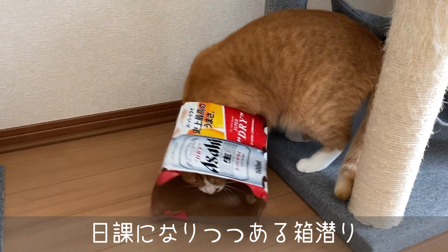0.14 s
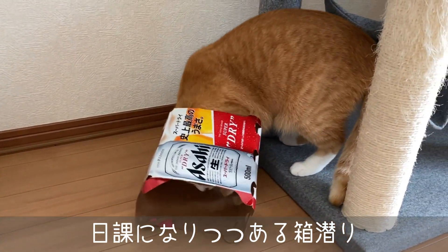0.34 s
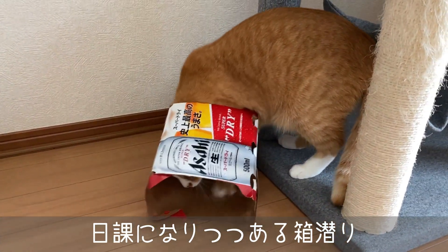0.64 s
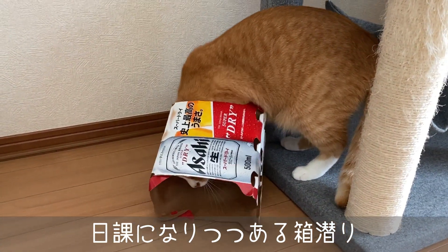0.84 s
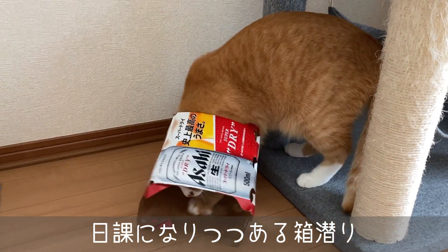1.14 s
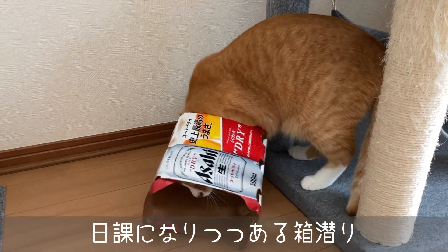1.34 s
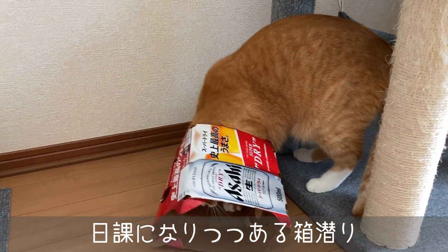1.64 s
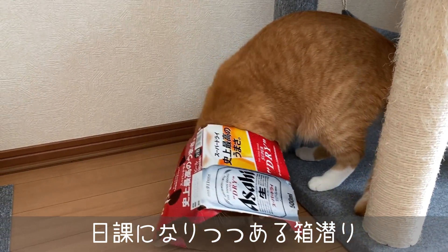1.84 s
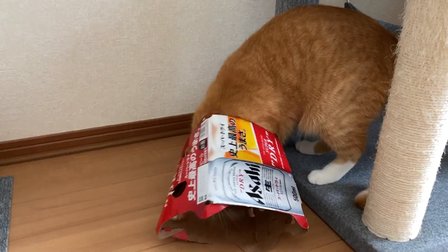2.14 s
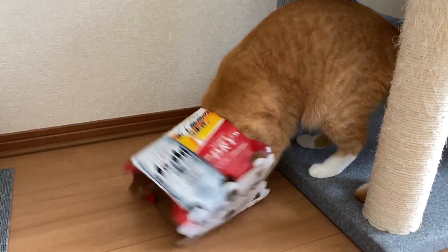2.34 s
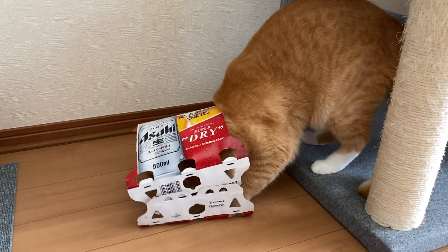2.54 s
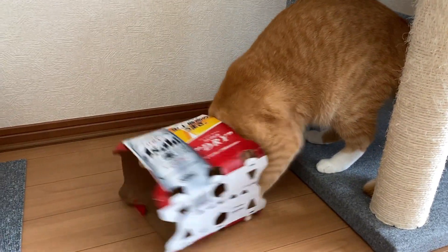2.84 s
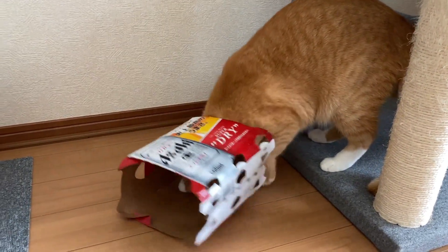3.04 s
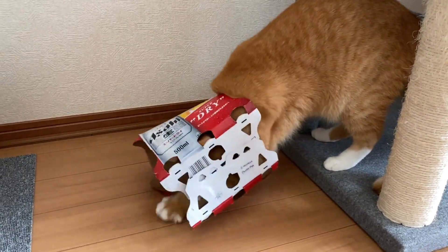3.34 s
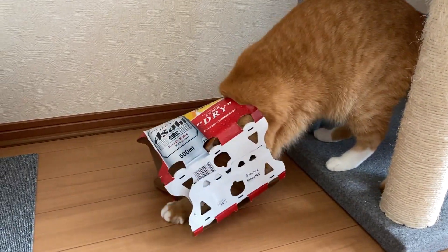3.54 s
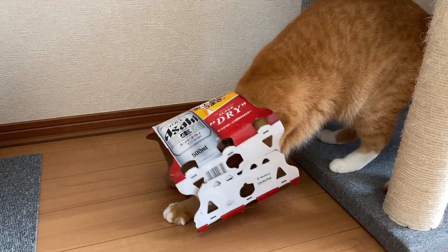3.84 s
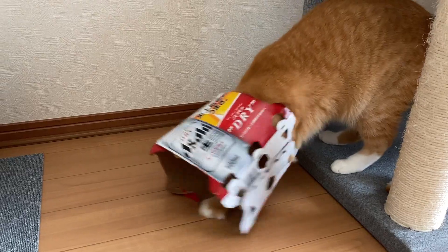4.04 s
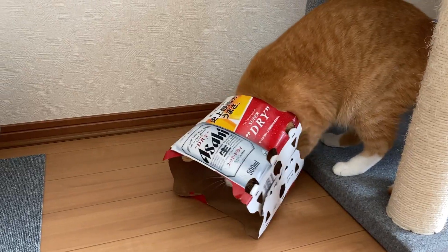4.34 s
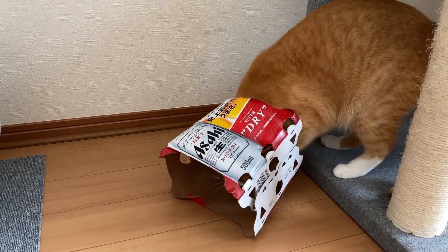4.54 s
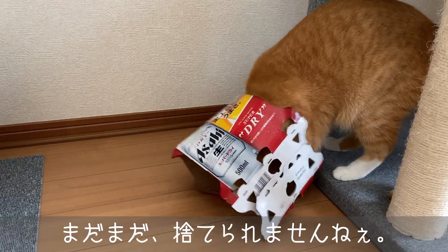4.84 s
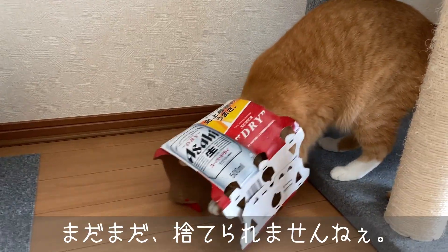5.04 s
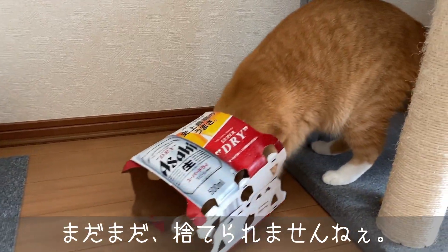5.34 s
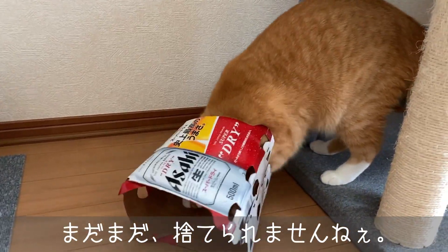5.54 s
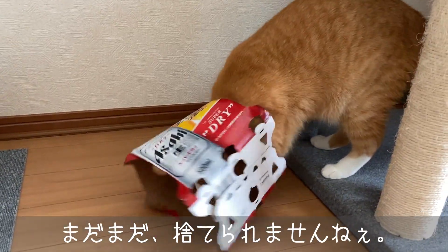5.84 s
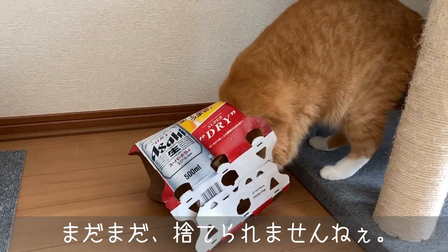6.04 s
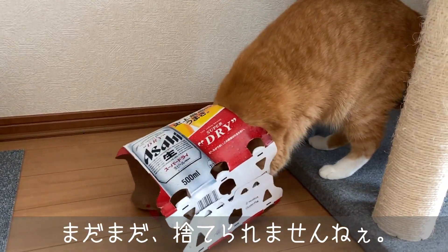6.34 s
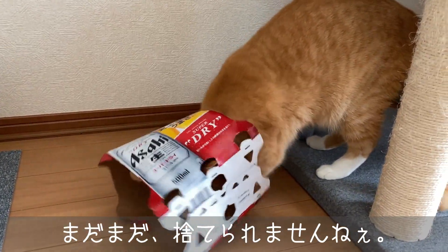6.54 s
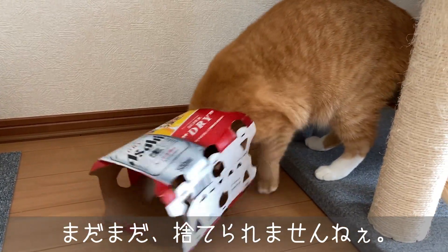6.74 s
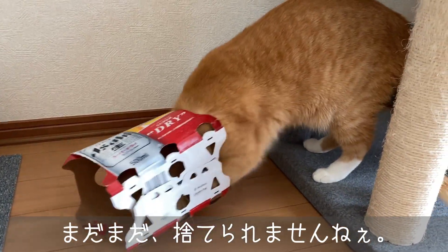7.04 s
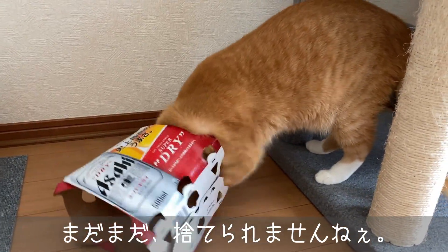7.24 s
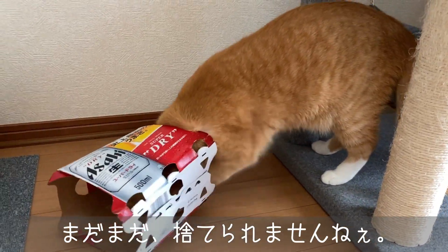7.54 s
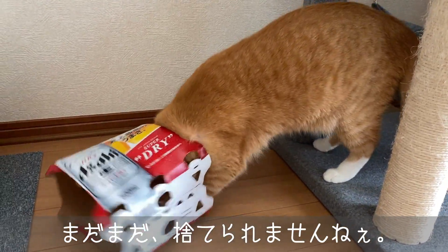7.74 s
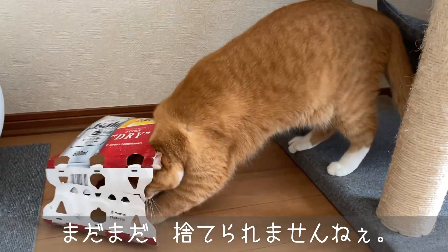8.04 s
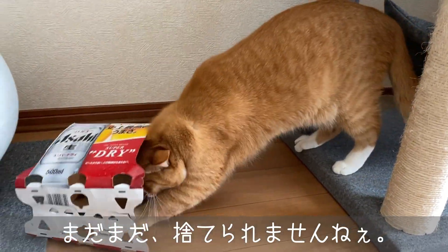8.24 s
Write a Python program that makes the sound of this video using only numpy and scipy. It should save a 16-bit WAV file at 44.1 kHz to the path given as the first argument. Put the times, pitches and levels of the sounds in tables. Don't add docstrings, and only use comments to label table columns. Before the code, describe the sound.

A small, quiet room heard close through a phone, with a faint low rumble of floorboards. From 0 to 2 s a cat nudges a thin cardboard sleeve very gently: soft fur brushes, weak rustles at about 0.6 and 1.2, a small tick and tap near 1.6. At 2.3 a stronger rasp swells into a loud boxy knock with a snap at 2.53, then a lighter knock at 2.86. Scrapes follow at 3.3, with a thud near 3.5 and crisp claw ticks at 3.85. Sliding builds to a bright scrape at 4.8 and a hard clack with floor thud at 4.93. Rubbing continues, rasping at 5.9, knocking at 6.27 and ticking sharply at 6.76. Around 7.08 to 7.25 an edge catches and stutters in a dense, loud cardboard judder. A knock at 7.44, hissy scrapes at 7.9, and a small tick at 8.24 lead to continued rustling at the end.

```python
import sys
import numpy as np
from scipy import signal
from scipy.fft import rfft, irfft, next_fast_len
from scipy.io import wavfile
from scipy.ndimage import uniform_filter1d, map_coordinates

SR = 44100
rng = np.random.default_rng(int(sys.argv[2]) if len(sys.argv) > 2 else 0)


def volts(x):
    e = np.asarray(x, float) / 20
    return 10 ** e


def master_out(mix):
    frames = np.transpose(np.atleast_2d(mix))
    ceiling = np.clip(frames, -1, 1)
    pcm = np.round(ceiling * 32767).astype(np.int16)
    wavfile.write(sys.argv[1], SR, pcm)


N = 369999

# (time [s], level [dB])
TREAD = [(0.0, -75), (0.61, -71), (0.72, -67), (1.38, -64), (2.08, -61.5), (3.36, -61), (3.67, -60.5),
         (3.88, -60), (4.53, -62.5), (5.61, -60), (5.8, -62.5), (6.4, -60), (7.45, -60), (7.57, -61.5),
         (8.16, -59.5), (8.39, -57)]
# (time [s], level [dB])
STIR = [(0, -82.5), (0.3, -81.5), (0.6, -75), (0.95, -78), (1.4, -70.5), (2, -70.5), (2.7, -66),
        (3.6, -68.5), (4.6, -68.5), (5.2, -68.9), (5.8, -74), (6.2, -66.5), (7, -67.5), (7.7, -67.5),
        (8.39, -64.5)]
# (frequency [Hz], density [dB per Hz])
RUMBLE = [(20, -20), (40, -12.5), (65, 3), (100, -6), (170, -4), (260, -12), (500, -75)]
# (frequency [Hz], density [dB per Hz])
SHUFFLE = [(150, -26), (250, -1), (500, -5.5), (750, -4), (1100, -19), (2000, -59)]
# (frequency [Hz], correlation [1])
ALIKE = [(60, 0.95), (200, 0.88), (400, 0.61), (800, -0.058), (1300, 0.69), (2300, 0.41), (4500, 0.11)]
# (start [s], rise [s], fall [s], peak pressure [dB])
SHOVES = [(.145, 0.1, 0.063, -68), (.586, 0.16, 0.17, -57.5), (.881, .023, .036, -71),
          (1.0, 0.019, 0.19, -68.5), (1.18, 0.13, 0.21, -55.5), (1.549, 0.022, 0.1, -56),
          (1.8, 0.028, 0.091, -77), (2.211, 0.02, 0.45, -55), (2.318, 0.24, 0.057, -43),
          (2.62, 0.37, 0.28, -54.5), (3.095, 0.077, 0.088, -55.5), (3.314, .11, 0.076, -48),
          (3.76, 0.06, 0.066, -51), (4.05, .13, 0.072, -49.5), (4.256, 0.13, .2, -56.5),
          (4.457, 0.034, 0.037, -60), (4.611, 0.058, 0.015, -60), (4.775, 0.037, 0.29, -51),
          (4.92, 0.046, 0.72, -49.5), (5.25, 0.5, 0.25, -50), (5.882, 0.1, 0.047, -45),
          (6.265, 0.017, 0.042, -38.5), (6.3, 0.25, 0.042, -54), (6.61, .04, 0.45, -49),
          (7.115, 0.036, .095, -36), (7.2, 0.047, 0.03, -41.5), (7.3, 0.058, 0.056, -48),
          (7.38, .07, 0.25, -50), (7.85, 0.11, 0.18, -48), (8.03, 0.293, 0.036, -54)]
# (start [s], rise [s], fall [s], peak speed [dB])
SLIDES = [(0.152, 0.015, 0.11, -58), (0.614, 0.1, 0.12, -52.5), (0.873, 0.025, 0.038, -69),
          (0.996, 0.0025, 0.3, -64.5), (1.186, 0.13, 0.083, -51.0), (1.51, 0.049, 0.14, -66),
          (1.81, 0.021, 0.041, -63), (2.213, 0.0099, 0.052, -59.9), (2.298, 0.21, 0.047, -42.5),
          (2.659, 0.14, 0.13, -53), (2.878, 0.091, 0.21, -49), (3.321, 0.091, 0.06, -45.5),
          (3.767, 0.028, 0.097, -55), (4.062, 0.084, 0.17, -52.5), (4.241, 0.13, 0.119, -48),
          (4.626, 0.039, 0.016, -67), (4.786, 0.11, 0.059, -39), (5.01, 0.029, 0.2, -48.5),
          (5.219, 0.2, 0.093, -55), (5.535, 0.1, 0.12, -45.5), (5.888, 0.087, 0.035, -40),
          (6.262, 0.021, 0.041, -51), (6.413, 0.052, 0.16, -59.5), (6.626, 0.098, 0.096, -42.5),
          (7.019, 0.16, 0.263, -55.5), (7.224, 0.018, 0.14, -49.8), (7.3, 0.048, 0.16, -42.5),
          (7.859, 0.056, 0.14, -41), (8.031, 0.07, 0.067, -51), (8.13, 0.19, .012, -49.5),
          (8.386, 0.004, 0.051, -49),
          (1.61, 0.022, .04, -67),
    (6.59, .01, .03, -66),
    (7.6, 0.023, 0.035, -59.5),
    (7.739, .03, .03, -64),
]
# (start [s], rise [s], fall [s], peak level [dB])
DRAGS = [(.64, 0.081, 0.22, -57.5), (2.9, 0.065, 0.11, -58), (3.77, 0.071, .1, -53),
         (6.74, 0.073, .03, -52.5), (4.28, 0.097, 0.23, -51), (4.8, 0.13, 0.04, -44),
         (5.12, .14, 0.2, -52.5), (5.54, 0.063, 0.092, -54), (6.42, 0.037, .1, -59),
         (7.125, 0.025, 0.07, -49), (7.23, 0.018, 0.023, -46), (7.32, .04, .05, -47)]
# (start [s], rise [s], fall [s], peak level [dB])
GRABS = [
    (4.757, 0.026, .04, -51),
    (7.083, 0.013, 0.032, -48),
]
GRAB_SPEED_DB = [1, -21]
# (frequency [Hz], density [dB per Hz])
RASP = [(300, -24), (650, -17), (950, -3.5), (1150, -2.5), (1500, -4.5), (2200, -3), (2600, -8.5),
        (4000, -28.5)]
SCRAPE = [(1300, -23), (2100, -6), (2500, -2), (3600, -3), (4800, -2.5), (6200, -12.5), (8000, -11.5),
          (10000, -23.5)]
HISS = [(3500, -20), (5500, -0.5), (7500, -1.5), (9500, 1.5), (11000, 0), (14000, 0), (15750, -5),
        (15900, -60)]
# (frequency [Hz], depth [dB])
FLEX_DB = [(400, 1.5), (1200, 2.5), (3000, 2), (8000, 1.5), (14000, 1)]
# (frequency [Hz], t60 [s])
ROOM = [(100, 0.38), (700, 0.36), (2000, 0.23), (8000, 0.042)]
# (time [s], peak level [dB], frequency [Hz])
THUDS = [(0.577, -44, 224), (0.612, -46.5, 200), (1.159, -42, 228), (1.185, -42, 269), (1.209, -43, 209),
         (1.574, -48, 240), (2.85, -42, 83), (2.858, -38.5, 259), (3.482, -35.5, 105.5), (3.64, -48, 71),
         (4.16, -50, 78), (4.17, -46.5, 195), (4.501, -38, 241), (4.938, -27.5, 251.4), (4.951, -45, 59.5),
         (5.2, -49, 100), (5.489, -50, 112), (6.286, -34, 187.5), (6.304, -32.5, 177), (6.32, -32, 207),
         (6.33, -45, 75.4), (6.762, -36, 267), (7.243, -40, 186.5), (7.259, -41, 91.4),
         (7.419, -38.5, 254.5), (7.436, -43.5, 78), (7.452, -39.5, 230), (8.368, -45, 73.6)]
# (frequency [Hz], level [dB], t60 [s])
PANELS = [(322, -2.5, 0.095), (491.6, -1.5, 0.16), (693, -0.5, 0.073), (797, -2.5, 0.047), (997, -3, 0.059),
          (1165, 0.5, 0.058), (1410, -3.5, 0.13), (1610, -1, 0.066), (1850, 2.5, 0.066), (2310, 1, 0.043),
          (2837, 1.5, 0.075), (3250, 4, 0.022), (3920, -7.5, 0.021), (4300, 2.5, 0.041)]
# (time [s], bottom [dB], side panels [dB], top panels [dB], flaps [dB])
DULL = [(0.5867, -51, -54.5, -48, -57), (0.6133, -49, -65, -74, -63), (1.1604, -45, -47.5, -54, -59),
        (1.1859, -45.5, -45, -40.5, -62), (2.534, -30, -19, -20.5, -29.5), (2.8566, -27.5, -35, -42, -45.5),
        (2.91, -52, -47, -61.5, -54), (3.4853, -40, -40, -41, -43), (3.856, -59, -57, -66, -51),
        (4.1903, -45.5, -49, -63, -60), (4.9297, -36, -34, -30, -37), (4.936, -36, -27.5, -25, -37),
        (5.494, -40, -53, -62, -70), (6.277, -42.5, -33, -43, -43), (6.2887, -38, -34, -42, -36),
        (7.2463, -35.5, -62, -40, -46)]
# (time [s], bottom [dB], side panels [dB], top panels [dB], flaps [dB])
HOLLOW = [(0.9007, -66, -57, -65, -69), (1.048, -60, -68, -78, -75), (1.572, -41.5, -62, -44, -52),
          (4.171, -70, -41.5, -43, -47), (4.5014, -38, -36, -44, -55), (4.9133, -35.5, -38, -38, -48),
          (6.2664, -43, -28, -33, -34), (6.582, -49, -48.5, -64, -54), (6.5969, -64, -57, -60, -63),
          (6.7638, -32, -36, -36, -32.5), (7.146, -73, -50, -32, -40), (7.4205, -60, -49, -53, -57),
          (7.4408, -52, -33, -42, -45), (8.2446, -46.5, -49, -60, -56)]
# (time [s], peak level [dB], frequency [Hz])
TICKS = [(1.0021, -58, 3790), (1.1605, -44.5, 3200), (1.5713, -43, 4260), (1.7275, -51, 4700),
         (2.8595, -38, 7050), (2.8597, -36, 11100), (3.8546, -30, 3110), (3.8549, -37, 6000),
         (3.8562, -29, 2320), (3.8625, -38, 2700), (3.8552, -36, 11000), (4.9277, -18.5, 4120),
         (4.9358, -19.5, 7700), (6.2652, -33, 3540), (6.2654, -37, 6500), (6.5969, -36, 12290),
         (6.7626, -22, 2360), (6.7628, -30, 6000), (6.7650, -20, 2280), (7.1322, -25.5, 3610),
         (7.44, -30, 4420), (8.2397, -34, 3750)]
# (time [s], peak level [dB], panel frequency [Hz])
SLIPS = [(1.162, -41, 1335), (1.171, -43, 1286), (1.57, -37, 1740), (2.225, -34.5, 2880),
         (2.271, -49, 1410), (2.332, -32, 1250), (2.5325, -19, 1700), (3.319, -42, 1170),
         (3.447, -34, 1920), (3.853, -29, 2175), (4.048, -50, 1420), (4.76, -41, 3050), (4.761, -47, 2100),
         (4.794, -28.5, 2290), (4.9335, -25.5, 1145), (5.882, -39, 2260), (5.974, -30.5, 1110),
         (6.248, -35, 1090), (6.255, -35, 1060), (6.264, -20, 1140), (6.275, -26, 1100), (6.286, -27, 1090),
         (7.081, -32, 1850), (7.081, -35, 3300), (7.09, -34, 2800), (7.108, -36, 2600), (7.098, -32, 1710),
         (7.123, -31, 1260), (7.134, -22, 1326), (7.13, -23, 2180), (7.132, -25, 2630), (7.131, -28, 3550),
         (7.139, -22, 1910), (7.143, -22, 1190), (7.1475, -20.5, 1620), (7.153, -29, 3270),
         (7.162, -35, 4500), (7.161, -27, 1170), (7.168, -31, 1370), (7.174, -27, 1640), (7.179, -31, 1105),
         (7.19, -29, 1155), (7.192, -31, 1700), (7.199, -26, 1750), (7.2, -34, 4430), (7.209, -30, 1940),
         (7.232, -27.5, 2095), (7.24, -27, 1890), (7.248, -35, 4350), (7.438, -33, 4460),
         (7.841, -42, 1140), (7.88, -34.5, 1010), (7.91, -37, 1150), (7.95, -36.5, 1080),
         (8.238, -40, 3750)]
# (time [s], peak level [dB], frequency [Hz])
BENDS = [(1.162, -48, 619), (2.33, -46, 770), (2.359, -47, 598), (2.409, -45.5, 616), (2.44, -45, 600),
         (2.466, -45, 540), (2.4950, -45, 560), (2.542, -35, 560), (2.555, -36, 687), (2.567, -40, 770),
         (2.584, -38.5, 700), (2.62, -51, 561.4), (2.856, -38.5, 481.3), (2.869, -41, 465),
         (2.907, -44, 560), (4.502, -39.5, 681), (4.515, -47, 560), (4.539, -44.5, 650), (4.968, -38, 750),
         (6.305, -38, 400), (6.318, -34, 340), (6.779, -41, 484), (7.25, -42, 330), (7.446, -39, 802),
         (7.452, -42, 696), (7.462, -44, 620)]
# (time [s], peak level [dB], t60 [s])
SNAPS = [
    (1.571, -43, 0.009),
    (2.8602, -29, .006),
    (3.8553, -33, .008),
    (4.171, -45, .006),
    (4.9365, -22, 0.0066),
    (6.5965, -42, .006),
    (2.5345, -26, 0.0066),
    (6.2665, -41, .006),
]

START_DB, END_DB, GONE_DB = -7.5, -11.5, -42
ONSET_S, SHOVE_RELEASE_S, SLIDE_RELEASE_S = 0.052, 0.14, 0.13
GRAB_ONSET_S, GRAB_RELEASE_S = 0.003, 0.03
SPEED_SHARE = 0.34
BRIGHTER, SHEEN_HZ = 0.18, 9300
DULL_RING_DB, HOLLOW_RING_DB = -18, -5
CRACK_DB = -4
SPLIT_HZ, IN_STEP_HZ, COMB_HZ = 6400, 6930, 4240


def unit(x):
    return x / np.sqrt(np.mean(x ** 2) + 1e-20)


def along(points, hz):
    f, v = np.transpose(points)
    return np.interp(np.log(hz + 1), np.log(f + 1), v)


def curve(rows):
    s, value = np.transpose(rows)
    return np.interp(np.arange(N) / SR, s, value)


def wobble(rate):
    knots = rng.standard_normal(int(N * rate / SR) + 4)
    return map_coordinates(knots, [np.arange(N) * rate / SR])


def filtered(x, response):
    m = next_fast_len(N + 8192)
    return irfft(rfft(x, m) * response(np.fft.rfftfreq(m, 1 / SR)), m)[..., :N]


def drifting_field(shape, across, over):
    field = uniform_filter1d(rng.standard_normal(shape), size=across, axis=0)
    return unit(uniform_filter1d(field, size=over, axis=1))


def rush(spectrum, alike, catches, size_db, patchy_db):
    grit = (rng.random((2, N)) < catches / SR) * volts(size_db)
    z = signal.stft(rng.standard_normal((2, N)) * (1 + grit), nperseg=256)[2]
    patches = drifting_field(z.shape[1:], across=3, over=9)
    pair = signal.istft(z * volts(patchy_db * patches), nperseg=256)[1][:, :N]

    def mid_side(hz):
        turn = np.arccos(np.clip(along(alike, hz), -1, 1)) / 2
        return volts(along(spectrum, hz)) * [np.cos(turn), np.sin(turn)]

    mid, side = filtered(pair, mid_side)
    return unit(np.array([mid + side, mid - side]))


def strokes(rows, rest_db, release_s, onset_s=ONSET_S):
    t, power = np.arange(0, N, 32) / SR, volts(2 * rest_db[::32])
    for s, rise, fall, db in rows:
        knots = s + np.cumsum([-onset_s, onset_s, rise, fall, release_s])
        shape_db = np.interp(t, knots, [GONE_DB, START_DB, 0, END_DB, GONE_DB], -99, -99)
        power = power + volts(2 * (db + shape_db))
    return np.interp(np.arange(N) / SR, t, 10 * np.log10(power))


def grabbed(rows, level_db):
    return strokes(rows, level_db, GRAB_RELEASE_S, GRAB_ONSET_S)


def motion():
    stir_db = curve(STIR)
    pressure_db = strokes(SHOVES, stir_db - 0.5, SHOVE_RELEASE_S)
    speed_db = strokes(SLIDES, 1.15 * stir_db + 3.5, SLIDE_RELEASE_S)
    skids = [(s, rise, fall, db + under_db)
             for (s, rise, fall, db), under_db in zip(GRABS, GRAB_SPEED_DB)]
    return stir_db, grabbed(GRABS, pressure_db), grabbed(skids, speed_db)


def room_tone(stir_db, pressure_db):
    tread_db = curve(TREAD)
    push_db = np.minimum(pressure_db - stir_db, 17)
    shuffle_db = 0.6 * stir_db + 0.4 * tread_db + 2.5 + 0.26 * push_db
    rumble = rush(RUMBLE, ALIKE, catches=0, size_db=0, patchy_db=0.8)
    shuffle = rush(SHUFFLE, ALIKE, catches=0, size_db=0, patchy_db=1.5)
    return volts(tread_db + 3.0 + 1.8 * wobble(7.7)) * rumble + volts(shuffle_db + 1.7 * wobble(14)) * shuffle


def panel_rasp(pressure_db, judder):
    level = volts(pressure_db - 0.24 + 1.2 * judder + 0.21 * wobble(110))
    rasp = level * rush(RASP, [(1000, 0.69)], catches=440, size_db=8.0, patchy_db=2.5)
    rasp[1] = np.roll(rasp[1], 6)
    return rasp


def edge_scrape(stir_db, pressure_db, speed_db, judder):
    between_db = SPEED_SHARE * speed_db + (1 - SPEED_SHARE) * pressure_db
    drag_db = grabbed(GRABS, strokes(DRAGS, stir_db + 2.5, SLIDE_RELEASE_S))
    scrape_db = 10 * np.log10(volts(2 * between_db) + volts(2 * drag_db))
    level = volts(scrape_db + 0.27 + 0.45 * judder + 0.86 * wobble(60))
    scrape = level * rush(SCRAPE, ALIKE, catches=800, size_db=8.5, patchy_db=1.58)
    return scrape * volts(np.array([[1.2], [-1.2]]))


def fur_hiss(speed_db, judder):
    level = volts(speed_db + 0.86 + 0.99 * judder + 1.2 * wobble(60))
    hiss = level * rush(HISS, ALIKE, catches=1100, size_db=5.0, patchy_db=2.5)
    sheen = filtered(hiss, lambda hz: np.clip((hz - SHEEN_HZ) / 3000, 0, 1))
    return hiss + (volts(BRIGHTER * (speed_db + 54.0)) - 1) * sheen


def rubbing(stir_db, pressure_db, speed_db):
    judder = wobble(35)
    scrape = edge_scrape(stir_db, pressure_db, speed_db, judder)
    return panel_rasp(pressure_db, judder) + scrape + fur_hiss(speed_db, judder)


def flexing(x):
    hz, _, z = signal.stft(x, SR, nperseg=1024)
    field = drifting_field(z.shape[1:], across=2, over=7)
    gain = volts(along(FLEX_DB, hz)[:, None] * field)
    gain = gain / np.sqrt(np.mean(gain ** 2, axis=1, keepdims=True))
    return signal.istft(z * gain, SR, nperseg=1024)[1][:, :N]


def tails(count):
    hz, t, z = signal.stft(rng.standard_normal((count, 2, SR // 4)), SR, nperseg=256)
    tail = signal.istft(z * volts(-60 * t / along(ROOM, hz)[:, None]), SR, nperseg=256)[1]
    return np.pad(tail / np.linalg.norm(tail[0, 0]), ((0, 0), (0, 0), (200, 0)))


def in_room(hit, tail, lag, wet_db):
    out = volts(wet_db) * signal.fftconvolve(hit[None], tail, axes=1)
    out[1, lag:lag + len(hit)] += hit
    out[0, :len(hit)] += hit
    return out


def thuds():
    out, t = np.zeros((2, N + SR)), np.arange(SR // 4) / SR
    for (s, db, hz), tail in zip(THUDS, tails(count=len(THUDS))):
        ring = np.sin(2 * np.pi * hz * t)
        ring -= 0.36 * np.sin(2 * np.pi * 1.6 * hz * t)
        ring -= 0.42 * np.sin(2 * np.pi * 0.648 * hz * t)
        ring *= volts(db + 1.0 - 60 * t * hz / 19) * (1 - np.exp(-t / 0.0021))
        hit = in_room(ring, tail, lag=0, wet_db=-15.5)
        out[:, round((s + 0.003) * SR):][:, :hit.shape[1]] += hit
    return out[:, :N]


def knocks():
    out, t = np.zeros((2, N + SR)), np.arange(SR // 8) / SR
    hz, mode_db, t60 = np.transpose(PANELS)[:, :, None]
    contact_s = 0.0015 * (hz / 1000) ** -0.45
    blow = (t / contact_s * np.exp(1 - t / contact_s)) ** 1.68
    blows = sorted([(*k, DULL_RING_DB) for k in DULL] + [(*k, HOLLOW_RING_DB) for k in HOLLOW])
    for (s, bottom_db, side_db, top_db, flap_db, ring_db), tail in zip(blows, tails(count=len(blows))):
        luck = rng.standard_normal((3, len(PANELS), 1))
        panel_db = np.select([hz < 600, hz < 1300, hz < 1750], [bottom_db, side_db, top_db], flap_db)
        level = panel_db + mode_db + 2.74 * luck[0]
        shape = blow + volts(ring_db - 60 * t / t60) * (1 - np.exp(-t / 0.0025))
        wave = np.sin(2 * np.pi * hz * (1 + 0.022 * luck[1]) * t + 3 * luck[2])
        body = np.sum(volts(level - 4.5) * shape * wave, axis=0)
        grain = np.convolve(rng.standard_normal(len(t)), [0.61, 0.9, 0.4, -0.5, -0.97, -0.69], "same")
        crack = grain * volts(flap_db + CRACK_DB - 60 * t / 0.0068)
        hit = in_room(body + crack, tail, lag=3, wet_db=-11.0)
        out[:, round(s * SR):][:, :hit.shape[1]] += hit
    return out[:, :N]


def swells(events, rise_s, trim_db, lag):
    out, t = np.zeros(N + SR), np.arange(SR // 40) / SR
    swell = t / rise_s * np.exp(1 - t / rise_s)
    for s, db, hz in events:
        ring = np.sin(2 * np.pi * hz * t) + 0.42 * np.sin(2 * np.pi * 1.2 * hz * t)
        out[round((s + 0.001) * SR):][:len(t)] += volts(db + trim_db) * swell * ring
    return np.array([out[:N], np.roll(out, lag)[:N]])


def claw_ticks():
    return swells(TICKS, rise_s=0.00046, trim_db=-2.5, lag=1)


def edge_slips():
    return swells(SLIPS, rise_s=0.0034, trim_db=-9.0, lag=6)


def panel_bends():
    return swells(BENDS, rise_s=0.005, trim_db=-5, lag=3)


def claw_snaps():
    out, t = np.zeros(N + SR), np.arange(SR // 50) / SR
    for (s, db, t60), noise in zip(SNAPS, rng.standard_normal((len(SNAPS), len(t)))):
        bright = np.diff(noise, prepend=0)
        out[round(s * SR):][:len(t)] += bright * volts(db - 60 * t / t60) * (1 - np.exp(-t / 0.0003))
    return np.array([out[:N], np.roll(out, 1)[:N]])


def scene():
    stir_db, pressure_db, speed_db = motion()
    floor = room_tone(stir_db, pressure_db) + thuds()
    friction = flexing(rubbing(stir_db, pressure_db, speed_db))
    return floor + friction + knocks() + claw_ticks() + edge_slips() + panel_bends() + claw_snaps()


def low_pass(x):
    return signal.sosfilt(signal.butter(12, 16810, fs=SR, output="sos"), x)


def record(dry):
    def share(hz):
        return np.clip((hz - SPLIT_HZ) / 500 + 0.5, 0, 1) * np.pi / 2

    def low_response(hz):
        low_cut = (1j * hz / (1j * hz + 30)) ** 2
        return np.cos(share(hz)) * low_cut

    def treble_response(hz):
        lead = np.exp(1j * np.pi * (hz - IN_STEP_HZ) / COMB_HZ * np.array([[-1], [1]]))
        return np.sin(share(hz)) * np.where(hz < 15830, 1, 0.012) * lead

    mix = filtered(dry, low_response) + filtered(dry[0], treble_response)
    return low_pass(mix)


dry = scene()
out = record(dry)
master_out(out)
```